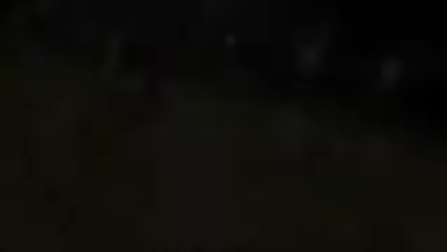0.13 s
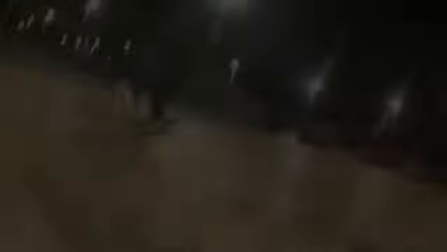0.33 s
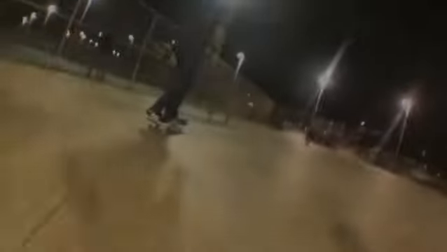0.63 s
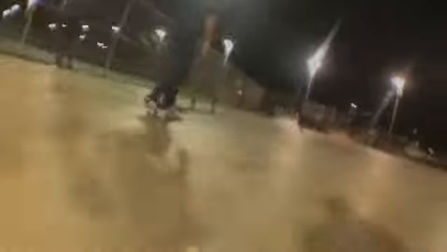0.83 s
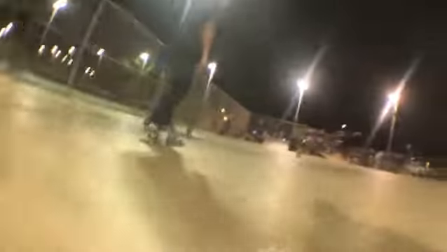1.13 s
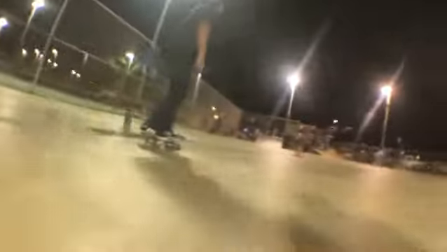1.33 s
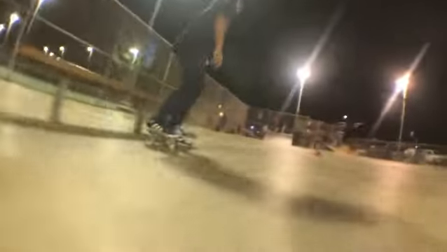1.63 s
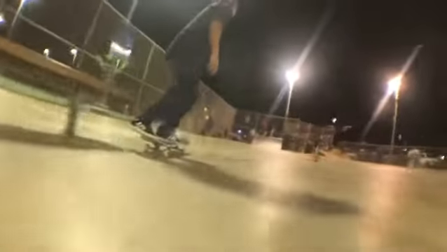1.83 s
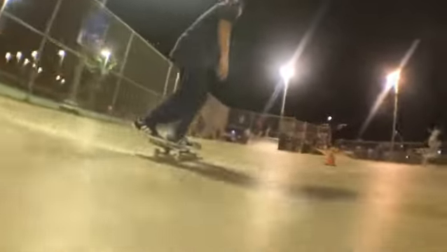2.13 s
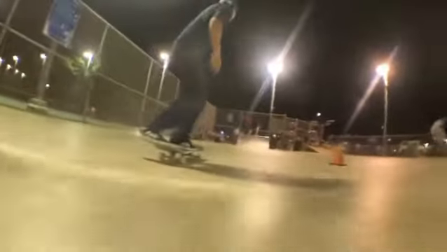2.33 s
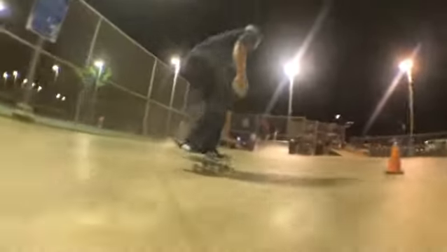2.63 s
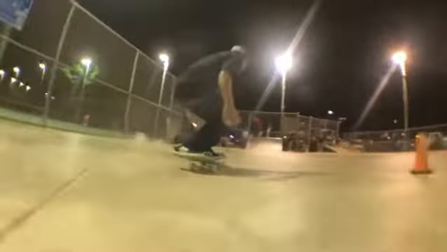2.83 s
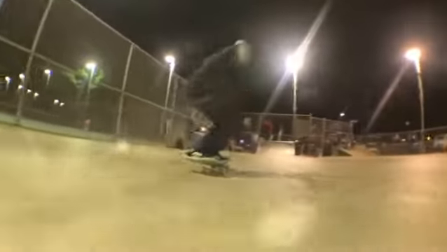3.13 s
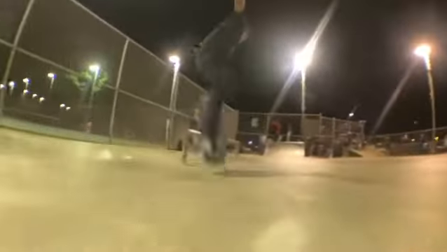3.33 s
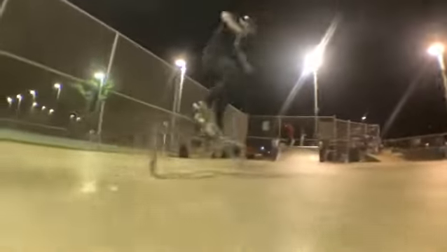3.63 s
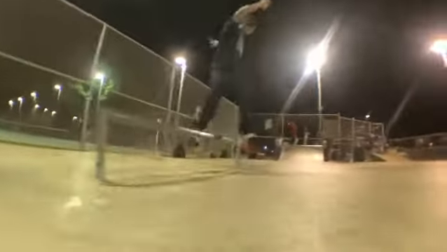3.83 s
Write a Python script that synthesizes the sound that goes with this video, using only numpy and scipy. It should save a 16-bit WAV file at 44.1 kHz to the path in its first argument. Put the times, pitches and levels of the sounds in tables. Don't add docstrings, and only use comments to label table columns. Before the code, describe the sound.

Two skateboards roll on rough outdoor concrete, one right beneath the stereo microphone, with hard wheel clacks; the one ahead pops, goes quieter in the air, knocks metal and slams down with wooden cracks and a ringing rail.

```python
import sys
import numpy as np
from scipy import signal
from scipy.fft import rfft, irfft, next_fast_len
from scipy.io import wavfile
from scipy.ndimage import uniform_filter1d

SR = 44100
rng = np.random.default_rng(int(sys.argv[2]) if len(sys.argv) > 2 else 0)


def attenuation_scalar(level_db):
    decades = np.asarray(level_db, float) / 20
    return 10 ** decades


def int16_out(signal):
    q = np.round(np.clip(np.atleast_2d(signal).T, -1, 1) * 32767)
    wavfile.write(sys.argv[1], SR, q.astype(np.int16))


N = 176400
T = np.arange(N) / SR
SIZE = next_fast_len(N + 4096)
HZ = np.fft.rfftfreq(SIZE, 1 / SR) + 1e-3

# time in seconds, roar in dB, rumble of the deck in dB.
ROLL_LEVELS = [(0, -22.5, -26.5), (.4, -30, -33), (.72, -29, -30.5), (.84, -20.5, -29), (1.0, -24, -32),
               (1.3, -26.5, -29), (1.7, -24.5, -26.5), (2.0, -28, -28), (2.4, -27, -28.5),
               (2.62, -29.5, -29), (2.74, -31.5, -30.5), (2.82, -23.5, -23), (3.0, -28, -25),
               (3.28, -28, -28), (3.36, -33.5, -33.5), (3.6, -38, -36.5), (3.9, -42.5, -39.5),
               (4, -34, -34)]
# time in seconds, hiss in dB, duller scratch in dB.
HISS_LEVELS = [(0, -42.5, -49), (.5, -41, -43), (.8, -40.5, -53), (.9, -36.5, -47.5), (1.4, -38.5, -40.5),
               (1.9, -35.5, -37.5), (2.3, -38, -39), (2.7, -38.5, -38.5), (3.3, -40.5, -40.5),
               (3.6, -42, -43), (4, -46, -52.5)]
# frequency in Hz, left in dB, right in dB.
ROAR_COLOUR = [(25.2, -24, -33), (56.5, -11, -9.5), (168, -5.5, -3), (328, -3, -8.5), (626, -4.5, -10.5),
               (1237, -0.5, -0.5), (1635, -7.5, -2.5), (2090, -24.5, -25)]
# frequency in Hz, level in dB.
HISS_COLOUR = [(1500, 10.5), (2500, 5), (4500, -8.5), (7000, 6), (9500, 2), (12000, -1.5), (15000, -6),
               (16500, -36)]
# frequency in Hz, width in Hz, left in dB, right in dB.
RESONANCES = [(135, 6.1, 4, -4), (481, 170, 5, 5.5), (709, 172, 7.5, -1), (946, 20, 11, 3.5),
              (1481, 102, 4.5, 7.5), (2220, 78, 1.5, 3), (3160, 2100, 11, 10), (4395, 830, 12.5, 11),
              (5200, 85, 7, 6)]
# frequency in Hz, share of power from 0 to 1.
LIKENESS = [(60, .35), (150, .88), (330, .9), (550, .4), (1200, .92), (2800, .8), (5000, .3), (7000, .96),
            (11000, .995)]
# frequency in Hz, phase in radians.
NEAR_PHASE = [(100, -1.4), (350, -2.0), (950, -.9), (1500, -.9), (2100, -1.3), (2600, -2.8), (7150, -9.4),
              (11800, -15.7), (16300, -22.)]
# frequency in Hz, phase in radians.
JOINT_PHASE = [(150, -1.2), (350, 1.), (600, 2.), (1500, 2.2), (2000, 3.9), (3000, 5.1), (4300, 6.6),
               (7150, 9.4), (11800, 15.7), (16300, 22.)]
# frequency in Hz, phase in radians.
FAR_PHASE = [(0, -1.), (600, -.8), (950, -.3), (1500, -.6), (3000, -1.1), (5600, -1.2), (7150, -3.1),
             (11800, -9.4), (16300, -15.7)]
# frequency in Hz, left minus right in dB.
FAR_LEAN = [(250, 0), (700, 4), (2000, 3), (3200, -1)]
# start in seconds, crack in dB, snap in dB, knock in dB, length in seconds.
JOINTS = [(.2012, -25, -50, -43, 0.0037), (.4566, -21, -23, -31, 0.0066), (.825, -32, -45, -17, .003),
          (1.9273, -31.5, -28, -25, .006), (1.9537, -30, -32.5, -21, 0.0078), (2.064, -24, -42, -12, 0.004),
          (2.0765, -19.5, -25, -13, 0.01), (2.1, -30, -29, -25, 0.017), (2.121, -22, -31, -20, .003),
          (2.1767, -19.5, -47, -37, 0.0026), (2.2047, -25, -40, -27, 0.0038),
          (2.4995, -27.5, -31, -36, 0.0037), (2.5335, -18, -34, -14, .003), (2.5374, -15, -21, -10, 0.0051),
          (2.548, -25, -28, -26, 0.012), (2.5708, -20.5, -15, -5, 0.0044), (2.5755, -16, -34, -10, 0.0063),
          (2.8437, -30.5, -32, -17, 0.0063), (2.943, -29.5, -25.5, -22, .006)]
# frequency in Hz, level in dB.
JOINT_COLOUR = [(2500, -20), (3700, -23.5), (5000, -5), (7000, -3.5), (9000, 1.5), (11500, -8.5),
                (14000, -7.5), (17000, -35)]
# start in seconds, frequency in Hz, level in dB, t60 in seconds.
NEAR_NOTES = [
    (2.08, 790, -4, 0.035),
    (2.122, 613, -12, .04),
    (2.538, 910, -11, .03),
    (2.572, 1096, -6, 0.044),
]
# start in seconds, crack in dB, snap in dB, knock in dB, length in seconds.
TRICK = [
    (3.3185, -15.5, -10.5, -14.5, 0.0058),
    (3.3225, -26, -12, -11, 0.0017),
    (3.336, -52, -33, -34, .004),
    (3.4712, -20, -24, -11, .0034),
    (3.4773, -21, -18, -13.5, 0.0095),
    (3.529, -26, -34, -43, .003),
    (3.7022, -20, -21.5, -15, 0.0066),
    (3.7447, -11, -44, -16.5, 0.013),
    (3.761, -21, -18, -14, 0.0017),
    (3.769, -32, -31, -21, 0.0048),
]
# frequency in Hz, level in dB.
TRICK_COLOUR = [(2500, -15), (3700, -5), (5000, -3), (7000, -3), (9000, 3), (11500, -6.5), (14000, -11),
                (17000, -26)]
# start in seconds,
# frequency in Hz, level in dB, t60 in seconds.
STRUCK_NOTES = [(0.8257, 1486, -14, 0.061), (2.064, 193, -16, 0.091), (2.0766, 190, -15, 0.085),
                (2.536, 206, -17.5, 0.07), (2.802, 135, -13.5, 0.17), (2.815, 192, -13.5, 0.11),
                (2.8452, 132, -9.5, 0.098), (2.868, 126, -27, 0.27), (2.933, 170, -10.5, 0.088),
                (2.9441, 1225, -10.5, 0.033), (2.946, 188, -17, 0.098), (2.983, 171, -14.5, 0.096),
                (3.3219, 1500, -11, 0.023), (3.32, 2220, -10, 0.044), (3.324, 293, -5.5, 0.029),
                (3.472, 308, -7.5, 0.047), (3.48, 300, -18.5, 0.043), (3.5842, 1370, -18.5, 0.017),
                (3.7035, 851, -18.5, 0.3), (3.708, 374, -9, 0.036), (3.722, 290, -23, 0.075),
                (3.747, 208, -11.5, 0.08), (3.761, 250, -18, 0.092)]
# pitch ratio, level in dB.
NEIGHBOURS = [(1.19, -5), (.73, -9)]
# start in seconds, level in dB, side 0 or top 1, shimmer in dB.
STRIKES = [
    (3.4773, -30, 0, -19),
    (3.7025, -33, 0, -38),
    (3.7438, -19.5, 1, -13.5),
    (3.761, -19, 1, -15.5),
]
RAIL_HZ = [842, 3006, 4562, 5157, 5518, 5936, 8156, 8408, 9180, 9541, 9609, 9690, 12870, 15300]
# level struck from the side in dB, struck on top in dB, t60 in seconds.
RAIL_MODES = [(-9, -7, 2.8), (-8.5, -30, 1.05), (-3, -16, 0.28), (-14, -18, 0.39), (-26, -25, .4),
              (-15, -22, 0.23), (1, -10, 0.75), (-17, -6, 0.42), (-5, -13, 0.094), (-9, -15, 0.22),
              (-14, -1.5, 0.24), (-20, -4, 0.24), (-25, -20, .22), (-26, -19, 0.43)]
# centre in seconds, frequency in Hz, level in dB, length in seconds.
SQUEAKS = [
    (0.926, 2940, -42, 0.013),
    (1.929, 3910, -26.5, .003),
    (3.67, 4700, -48, 0.016),
    (3.983, 4550, -35, 0.011),
]

START_S, FADE_S = 0.119, 0.94
GRIT_PER_S, GRIT_SPREAD_DB = 4600, 1
DECK_HZ, SCRATCH_HZ = 274, 3570
DWELL = 0.45
CRACK_T60_S, KNOCK_T60_S = 0.0069, 0.027
AFTER_DB, AFTER_T60_S = -15.5, 0.1
SAG_DB = 6.5
SNAP_HZ, JOINT_HZ, KNOCK_HZ = (1570, 3500), (420, 1640), (278, 1890)
SWELL_CYCLES = 0.97
SPLIT, RATTLE_DB = 0.0035, 1.5
SHIMMER_HZ, SHIMMER_T60_S = (3200, 15500), 0.15
CUTOFF_HZ = 16800


def rms_one(x):
    return x / np.sqrt(np.mean(x ** 2) + 1e-20)


def column(rows, at, index=1, warp=np.asarray):
    table = np.array(rows)
    return np.interp(warp(at), warp(table[:, 0]), table[:, index])


def colour_gain(rows, index=1):
    return attenuation_scalar(column(rows, HZ, index, warp=np.log))


def shape(x, gain):
    return irfft(rfft(x, SIZE) * gain, SIZE)[..., :N]


def band(x, low_hz, high_hz):
    return signal.sosfilt(signal.butter(3, [low_hz, high_hz], "band", fs=SR, output="sos"), x)


def drift(rate_hz):
    r = np.exp(-32 * np.pi * rate_hz / SR)
    chance = rng.standard_normal(N // 16 + 1002)
    slow = signal.lfilter([1], [1, -2 * r, r * r], chance)[1000:]
    return np.interp(np.arange(N) / 16, np.arange(len(slow)), rms_one(slow))


def microphones(shared, own, phase, alike, colour):
    angle = column(phase, HZ)
    turn = np.exp(1j * np.outer([-0.5, 0.5], angle - DWELL * np.sin(2 * angle)))
    common = rfft(shared, SIZE) * np.sqrt(alike) * turn
    return colour * (common + rfft(own, SIZE) * np.sqrt(1 - alike))


def grit(lumpy_db):
    spread = np.minimum(rng.exponential(1, (3, N)), 5)
    sizes = attenuation_scalar(GRIT_SPREAD_DB * spread) * rng.choice([-1, 1], (3, N))
    hits = rng.random((3, N)) < GRIT_PER_S / SR
    clicks = sizes * hits + 0.3 * rng.standard_normal((3, N))
    return clicks * attenuation_scalar(lumpy_db * (drift(13.0) + 0.64 * drift(48)))


def body(index):
    return attenuation_scalar(sum(row[index] / (1 + (2 * (HZ - row[0]) / row[1]) ** 2) for row in RESONANCES))


def rolling():
    alike = np.clip(column(LIKENESS, HZ, warp=np.log), 0, 1)
    bodies = np.array([body(index=2), body(index=3)])
    low, high = grit(lumpy_db=1.66), grit(lumpy_db=1.44)

    roar_gain = np.array([colour_gain(ROAR_COLOUR, k) for k in (1, 2)]) / (1 + (HZ / 2600) ** 6)
    wheels = microphones(low[0], low[1:], NEAR_PHASE, alike, roar_gain * bodies)
    hiss_gain = colour_gain(HISS_COLOUR) / (1 + (1500 / HZ) ** 4)
    hiss = microphones(high[0], high[1:], NEAR_PHASE, alike, hiss_gain * bodies)

    deck = 1 / (1 + (HZ / DECK_HZ) ** 4)
    dull = 1 / (1 + (HZ / SCRATCH_HZ) ** 8)
    layers = [
        (column(ROLL_LEVELS, T), wheels * (1 - deck)),
        (column(ROLL_LEVELS, T, index=2) + 0.5 * drift(19.0), wheels * deck),
        (column(HISS_LEVELS, T), hiss * (1 - dull)),
        (column(HISS_LEVELS, T, index=2), hiss * dull),
    ]
    return sum(attenuation_scalar(db) * rms_one(irfft(layer, SIZE)[:, :N]) for db, layer in layers)


def burst(rows, index, t60, more_db=0):
    out, since = np.zeros(N + SR), np.arange(SR // 4) / SR
    attack = np.clip(since / 0.00051, 0, 1)
    for row in rows:
        start, length = int(row[0] * SR), row[4]
        sag_db = SAG_DB * np.clip(since / length, 0, 1)
        fall_db = 60 * np.clip(since - length, 0, 1) / t60
        out[start:][:len(since)] += attenuation_scalar(row[index] + more_db - sag_db - fall_db) * attack
    return out[:N]


def steady_band(x, limits_hz):
    x = band(x, *limits_hz)
    return x / np.sqrt(uniform_filter1d(x ** 2, size=200))


def blows(rows, colour, knock_hz):
    crack = burst(rows, 1, CRACK_T60_S) + burst(rows, 1, AFTER_T60_S, AFTER_DB)
    white = rng.standard_normal((2, N)) * attenuation_scalar(2.0 * drift(300))
    bright = rms_one(shape(white[0], colour_gain(colour)))
    snap = burst(rows, 2, KNOCK_T60_S) * steady_band(white[0], SNAP_HZ)
    knock = burst(rows, 3, KNOCK_T60_S) * steady_band(white[1], knock_hz)
    return crack * bright + band(snap, *SNAP_HZ) + band(knock, *knock_hz)


def struck_notes(rows):
    out, since = np.zeros(N + SR), np.arange(SR // 3) / SR
    for s, hz, db, t60 in rows:
        phase = 2 * np.pi * hz * since
        tone = np.sin(phase)
        for ratio, near_db in NEIGHBOURS:
            tone = tone + attenuation_scalar(near_db) * np.sin(phase * ratio)
        swell = np.clip(since * hz / SWELL_CYCLES, 0, 1)
        out[int(s * SR):][:len(since)] += attenuation_scalar(db - 60 * since / t60) * swell * tone
    return out[:N]


def ring(clicks, hz, t60):
    r, w = attenuation_scalar(-60 / (t60 * SR)), 2 * np.pi * hz / SR
    return signal.lfilter([0, np.sin(w)], [1, -2 * r * np.cos(w), r * r], clicks + 1e-18)


def rail():
    s, db, on_top, shimmer_db = np.transpose(STRIKES)
    first = int(s[0] * SR) - 1
    at, out = (s * SR).astype(int) - first, np.zeros(N)

    chances = rng.random((len(RAIL_MODES), 2))
    for hz, (side_db, top_db, t60), (apart, weaker) in zip(RAIL_HZ, RAIL_MODES, chances):
        clicks = np.zeros(N - first)
        clicks[at] = attenuation_scalar(db + np.where(on_top > 0.5, top_db, side_db))
        twin = ring(clicks, hz * (1 + SPLIT * (0.35 + apart)), 0.8 * t60)
        pair = ring(clicks, hz, t60) + (0.3 + 0.15 * weaker) * twin
        out[first:] += pair * attenuation_scalar(RATTLE_DB * np.clip(drift(56)[first:], -3, 1))

    low_hz, high_hz = SHIMMER_HZ
    for share, life, *sizes in rng.random((260, 2 + len(at))):
        hz, clicks = low_hz * (high_hz / low_hz) ** share, np.zeros(N - first)
        mode_db = shimmer_db - 15.5 + column(TRICK_COLOUR, hz, warp=np.log)
        clicks[at] = attenuation_scalar(mode_db) * (2 * np.array(sizes) - 1)
        out[first:] += ring(clicks, hz, SHIMMER_T60_S * (0.5 + life))
    return out


def squeaks():
    waver, out = 1.3 * drift(80), np.zeros(N)
    for s, hz, db, length in SQUEAKS:
        out += attenuation_scalar(db) * np.exp(-((T - s) / length) ** 2) * np.sin(2 * np.pi * hz * T + waver)
    return out


def placed(x, phase, alike, lean_db):
    echoes = np.array([np.roll(x, 61), -np.roll(x, 97)])
    lean = attenuation_scalar(np.outer([0.5, -0.5], lean_db))
    return irfft(microphones(x, echoes, phase, np.clip(alike, 0, 1), lean), SIZE)[:, :N]


def scene():
    far = blows(TRICK, TRICK_COLOUR, KNOCK_HZ) + struck_notes(STRUCK_NOTES) + rail() + squeaks()
    wheels = rolling()
    near = blows(JOINTS, JOINT_COLOUR, JOINT_HZ) + struck_notes(NEAR_NOTES)
    below = placed(near, JOINT_PHASE, alike=0.81, lean_db=0 * HZ)
    ahead = placed(far, FAR_PHASE, alike=0.95, lean_db=column(FAR_LEAN, HZ, warp=np.log))
    return wheels + below + ahead


def top_cut(x):
    return signal.sosfilt(signal.butter(12, 16800, fs=SR, output="sos"), x)


def record(dry):
    opening = np.clip((T - START_S) / 0.012, 0, 1)
    faded = dry * np.clip(T / FADE_S, 0, 1) * opening
    rounded = 1.325 * np.tanh(faded / 1.277)
    return top_cut(shape(rounded, HZ < CUTOFF_HZ))


dry = scene()
out = record(dry)
int16_out(out)
```